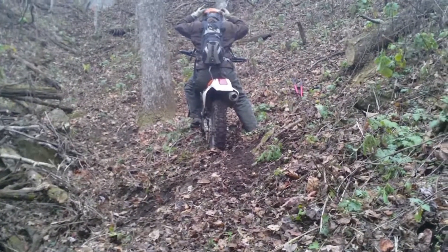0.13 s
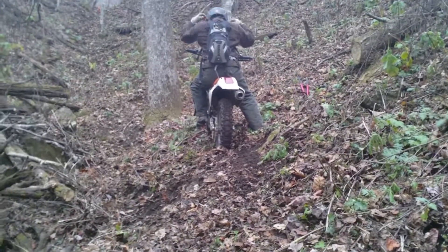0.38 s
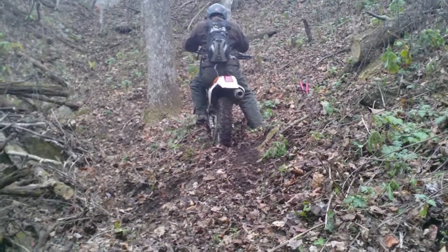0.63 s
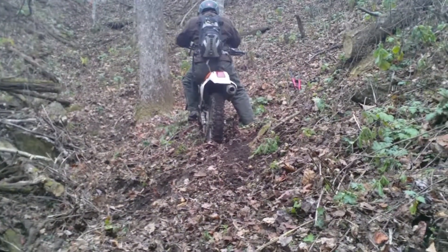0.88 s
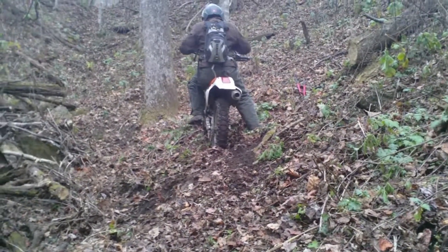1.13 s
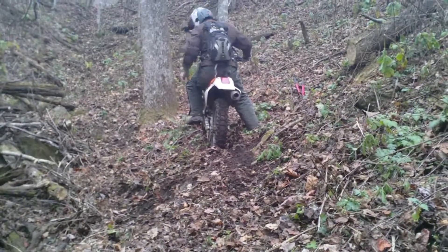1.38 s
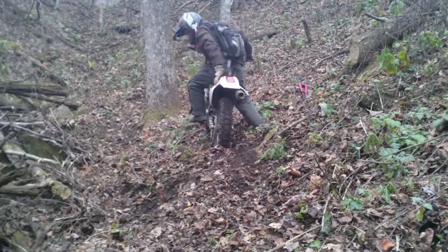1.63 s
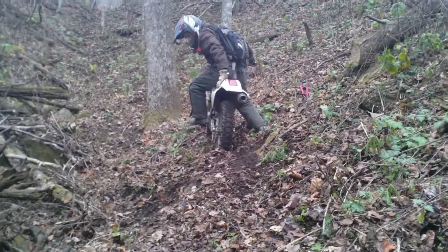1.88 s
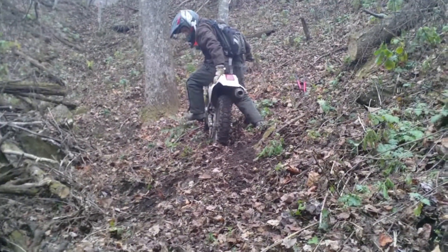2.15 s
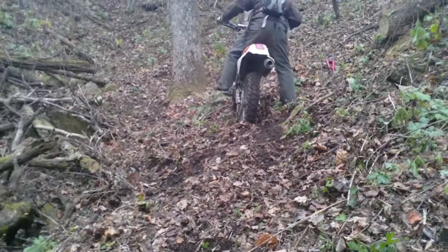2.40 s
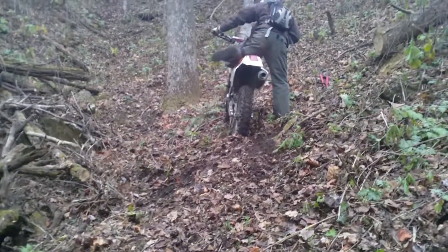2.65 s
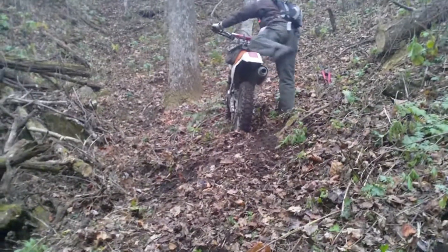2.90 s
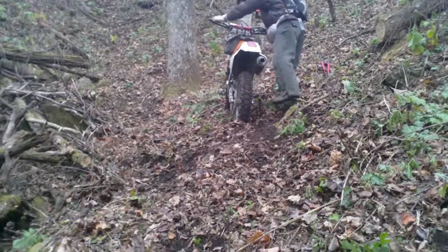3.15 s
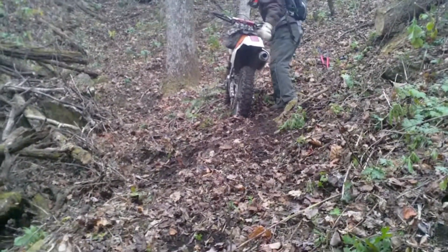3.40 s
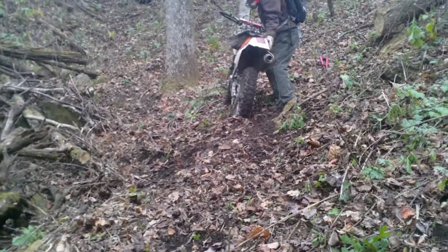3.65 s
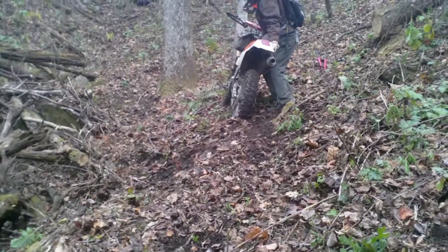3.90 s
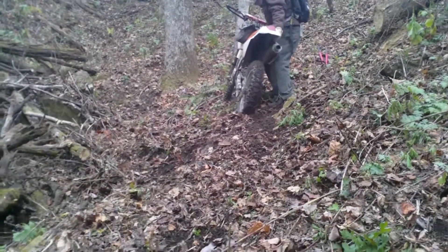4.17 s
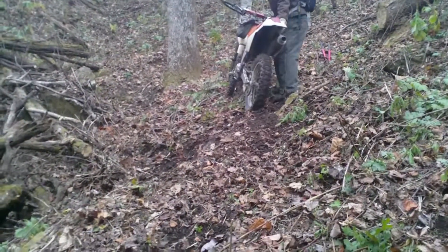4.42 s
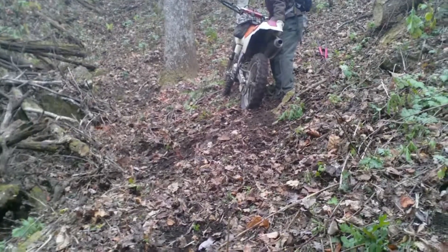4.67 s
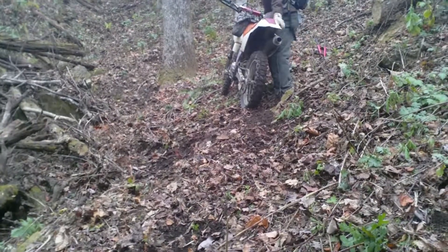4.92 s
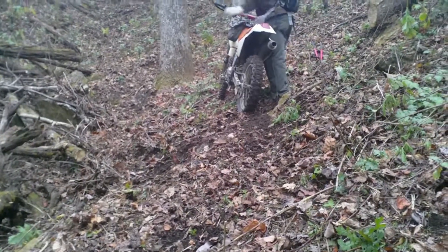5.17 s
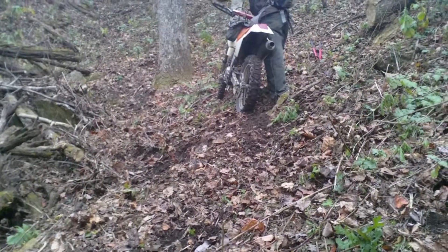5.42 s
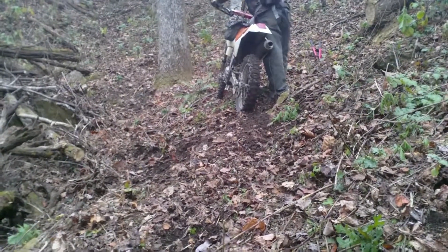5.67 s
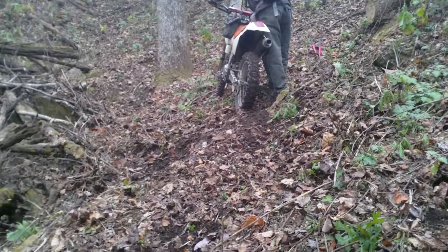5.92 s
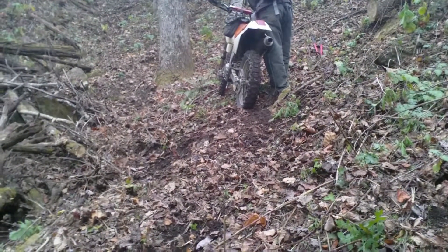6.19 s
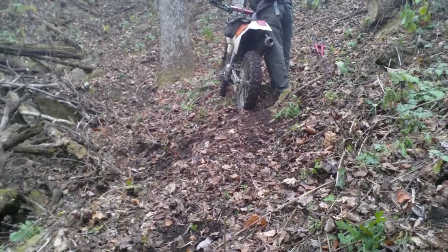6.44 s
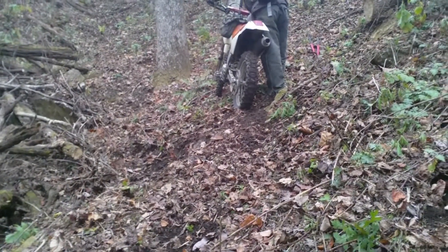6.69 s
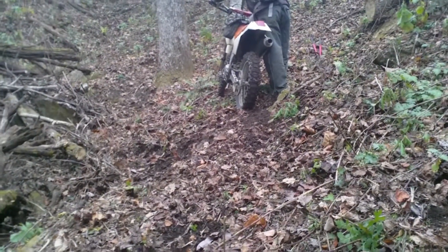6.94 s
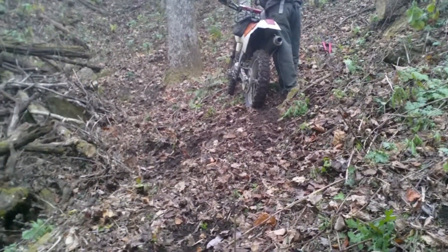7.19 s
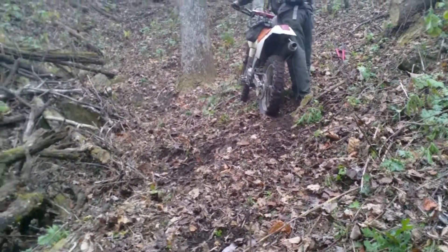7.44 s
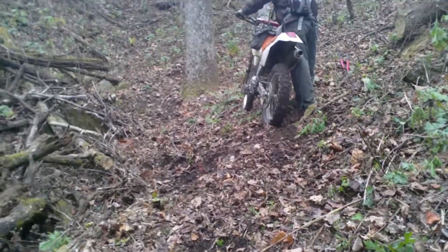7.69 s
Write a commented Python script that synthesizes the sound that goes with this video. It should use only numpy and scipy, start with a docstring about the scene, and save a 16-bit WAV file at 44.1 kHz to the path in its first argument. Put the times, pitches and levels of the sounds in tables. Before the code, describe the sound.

A single-cylinder dirt bike idles roughly a few metres away on a wooded slope, its tail pipe facing the microphone. Hollow low thumps come about fourteen a second, with barky edges, misfires and light gear clatter. A small dry twig click comes early. Around six seconds loud backfires crack and the engine sputters faster; another bang follows near seven, before the idle returns. Short woodland reflections, faint hiss.

```python
"""Dirt bike idling in the woods

A single-cylinder four-stroke idles unevenly on a wooded slope, tail pipe towards a microphone some metres behind.
Each exhaust stroke plays filtered pulses: thump, bark, boom, gas noise and a valve tick; weak strokes misfire,
a few backfire loudly. Slope and trees add echoes and a short scatter; the ground adds a delayed dull copy.
Gear clatter runs on as flickering noise, one twig snaps, and faint hiss and steady tones lie underneath."""
import sys
import numpy as np
from scipy import signal
from scipy.fft import rfft, irfft
from scipy.io import wavfile
from scipy.ndimage import uniform_filter1d

SR = 44100
rng = np.random.default_rng(int(sys.argv[2]) if len(sys.argv) > 2 else 0)


def attenuation_scalar(level_db):
    """Turn a level in dB into a linear amplitude multiplier (20 dB per decade)."""
    decades = np.asarray(level_db, float) / 20
    return 10 ** decades


def transcribe(u):
    """Save the signal u as a 16-bit wav file named by the first command-line argument.

    u: samples, shape (n,) or (channels, n), limited to [-1, 1]; the rate is SR.
    q: integer samples, one column per channel.
    """
    v = np.clip(np.atleast_2d(u).T, -1, 1)
    q = np.round(v * 32767).astype(np.int16)
    wavfile.write(sys.argv[1], SR, q)


N = 344862
SIZE = 4096  # samples in one stroke shape
FULL_THUMP_DB = -20.5  # thumps below this are duller and quieten the running gear

# Silencer modes. Each row: nominal frequency in Hz, relative level in dB, t60 in s.
PIPE = [(605, -0.5, 0.092), (729, -7.5, 0.044), (946, -2, 0.054), (1066.6, -1.5, 0.046), (1237, 3.5, 0.04),
        (1511, -1, 0.05)]
# Pipe round trips, bank and trunks. Each row: delay in ms, signed gain of the low swing, of the high swing.
ECHOES = [(3.4, .17, .26), (3.95, -.22, -.22), (5.31, -.27, -.07), (6.26, -.25, -.28), (7.48, -.08, -.34),
          (8.84, -.22, -.01), (9.93, -.07, .16), (12.65, -.09, -.1), (14.01, .19, 0), (15.31, .07, .26),
          (16.8, .25, .18), (21.84, -.08, -.06), (37.5, .07, .07)]
# Engine state. Each row: time in s, then levels in dB before trims: thump, bark, running gear.
ENGINE = [(0, -21, -23.5, -41), (.6, -20, -22, -46), (1.1, -20.5, -27, -46), (1.9, -20.5, -22, -44.5),
          (2.3, -20, -30, -44), (3.07, -20.5, -22.5, -41.5), (3.5, -20, -23, -44.5), (4.2, -21, -39, -43),
          (5.6, -21, -28, -45), (5.9, -20, -26.5, -40), (6.6, -20.5, -24.5, -42.5), (7.5, -21, -30, -43),
          (7.82, -17, -30, -43.5)]


def ring(x, hz, width_hz, order=1):
    """A resonance with gain 1 at its centre, applied order times."""
    for _ in range(order):
        x = signal.lfilter(*signal.iirpeak(hz, hz / width_hz, SR), x)
    return x


def unit(x):
    """Scale to rms 1."""
    return x / np.sqrt(np.mean(x ** 2))


def coloured(points):
    """Noise with the spectrum of (Hz, dB) points."""
    hz, db = np.transpose(points)
    f = np.fft.rfftfreq(N, 1 / SR) + 1
    return irfft(rfft(rng.standard_normal(N)) * attenuation_scalar(np.interp(np.log(f), np.log(hz), db)), N)


def walk(rate_hz):
    """Random levels held 1 / rate_hz s and slewed twice."""
    k = int(SR / rate_hz)
    held = np.repeat(rng.standard_normal(N // k + 1), k)
    return 1.05 * uniform_filter1d(uniform_filter1d(held, k), k)[:N]


def late(x, ms):
    """Delay by a fractional time."""
    n = np.arange(len(x))
    return np.interp(n - ms * SR / 1000, n, x, left=0)


def ground(x, gain=.95):
    """Direct path plus the bounce 0.9 ms later off the leaf litter, which swallows the treble."""
    soft = signal.sosfilt(signal.butter(2, 1900, fs=SR, output="sos"), x)
    return x + gain * late(soft, .9)


def play(s, gain, shape):
    """Start the shape at each time with its gain, split between the two nearest samples."""
    train = np.zeros(N + 1)
    at = np.clip(s * SR, 0, N - 1)
    np.add.at(train, at.astype(int), gain * (1 - at % 1))
    np.add.at(train, at.astype(int) + 1, gain * (at % 1))
    return signal.fftconvolve(train, shape)[:N]


def modes(table, stretch, rise_s):
    """Struck modes that build up over rise_s; hotter gas stretches all pitches."""
    t = np.arange(SIZE) / SR
    rings = np.zeros(SIZE)
    for k, (hz, db, t60_s) in enumerate(table):
        tone = np.sin(2 * np.pi * hz * stretch * t)
        rings += (-1) ** k * attenuation_scalar(db) * tone * 1000. ** (-t / t60_s)
    return rings * (1 - np.exp(-(t / rise_s) ** 2))


def through_pipe(x, share):
    """Part of a noise sings in the silencer modes; rms 1."""
    return unit(x + share * sum(ring(x, hz, 39) for hz, _, _ in PIPE))


def blast(hz, width_hz, order, echo_gains):
    """The pipe mouth draws in first, then swings (peak 1); fixed echoes follow."""
    direct = ground(ring(-np.eye(1, SIZE)[0], hz, width_hz, order=order))
    direct = direct / np.abs(direct).max()
    return direct + sum(g * late(direct, row[0]) for row, g in zip(ECHOES, echo_gains))


def strokes():
    """Every exhaust stroke: time and levels of thump, bark, scatter, crack and valve tick, all led by the burn."""
    # Strokes that stand out: misfires, weak burns, backfires, changes of pace.
    # Each row: time in s, burn in dB against a plain stroke.
    marked = [(0.0509, 0.7), (0.3669, -3), (0.6947, -11.5), (0.9011, -3.5), (1.3321, 1), (1.4676, 0.9),
              (1.7354, 0.8), (2.1307, -8.5), (2.2006, -3.5), (2.2717, 0.4), (2.3512, -0.2), (2.4859, -10),
              (2.8379, 0), (2.9061, -2.5), (3.1102, 0.0), (3.242, -9), (3.4443, 0.5), (3.5737, -4),
              (3.7788, -3), (3.9902, -1.5), (4.1353, -3.5), (4.2763, 0.6), (4.3452, -3.5), (4.415, -19),
              (4.5719, -1), (4.7229, 0.6), (4.8676, -5.5), (4.9437, -6.5), (5.0999, -2.5), (5.2544, -0.6),
              (5.3251, 1), (5.4003, -21), (5.472, -23), (5.6268, -2.0), (5.7048, -0.2), (5.8505, 2.5),
              (5.917, 9.5), (5.964, 6.5), (6.015, -4), (6.0634, -7.5), (6.114, -10.5), (6.166, -13.5),
              (6.2135, 6), (6.2734, -7.5), (6.335, -24), (6.3848, -13), (6.4444, -9.5), (6.6442, -1.6),
              (6.7811, -9.5), (6.8544, 3.5), (6.9213, 8), (6.9765, -9), (7.027, -10), (7.0805, -9.5),
              (7.13, -8.5), (7.1905, -9.5), (7.2558, -17), (7.3202, -1.3), (7.6745, -3), (7.745, -10.5)]
    # How a layer follows the burn. Each: plain level in dB, dB per dB of weak burn, of strong burn,
    # lowest and highest dB before racing and scatter, racing lift in dB, own scatter in dB.
    scatter_law = (-30, 0.78, 2.5, -70, -15, 4.5, 0.7)
    crack_law = (-42.5, 2, 2.5, -57.5, -15, 10.5, 3)
    tick_law = (-57.5, 1.7, 1, -67.5, -48, 8, 3)
    idle_stroke_s, racing_s = .07, .061  # spacing of plain strokes; closer than racing_s, the engine races
    burn_scatter_db, backfire_from_db = 0.92, 3.5
    bark_per_weak_db, bark_per_backfire_db = 1.23, 5.75  # dB per dB of burn
    bark_racing_db, bark_scatter_db = 13.5, 4

    # Plain strokes fill the time between marked ones.
    at, marked_db = np.transpose(marked)
    gaps = np.maximum(1, np.round(np.diff(at) / idle_stroke_s))
    number = np.cumsum([0, *gaps]).astype(int)
    s = np.interp(np.arange(number[-1] + 1), number, at)

    chance = np.clip(rng.standard_normal((len(s), 5)), -2, 2).T
    burn = burn_scatter_db * chance[0]
    burn[number] = marked_db
    weak, strong = np.minimum(burn, 0), np.maximum(burn, 0)
    backfire = np.maximum(burn - backfire_from_db, 0)
    ordinary = backfire == 0  # backfires get no scatter
    racing = (np.diff(s, prepend=-1) < racing_s) & (burn < 0)

    def follow(law, z):
        """Layer level in dB from the burn, racing and chance."""
        plain, per_weak, per_strong, lowest, highest, lift, spread = law
        level = np.clip(plain + per_weak * weak + per_strong * strong, lowest, highest)
        return level + lift * racing + spread * z * ordinary

    when, thump_db, bark_db, _ = np.transpose(ENGINE)
    thump = np.interp(s, when, thump_db) + burn
    bark = np.interp(s, when, bark_db) + bark_per_weak_db * weak + bark_per_backfire_db * backfire
    bark = bark + bark_racing_db * racing + bark_scatter_db * chance[1] * ordinary
    scatter, crack = follow(scatter_law, chance[2]), follow(crack_law, chance[3])
    return s, thump, bark, scatter, crack, follow(tick_law, chance[4])


def exhaust(s, thump_db, bark_db, scatter_db):
    """Thump and boom keep their shapes; bark and silencer ring shift a little from stroke to stroke."""
    # Low and high swing of the pipe mouth.
    # Each row: centre in Hz, width of one filter pass in Hz, lead in ms, trim in dB.
    mouth = [(287, 1018, 2.33, 3.7), (600, 668, 2.93, 1.3)]
    # Lowest pipe modes. Each row: nominal frequency in Hz, relative level in dB, t60 in s.
    low_modes = [(71, -23, 0.084), (141.9, -20.5, 0.2), (290, -16, 0.074)]
    dull_per_db = 0.8  # weaker thumps lose their high swing faster
    boom_lead_s, bark_lead_s = .0030, .0020

    chance = rng.standard_normal((len(s), 3)).T
    _, *echo = np.transpose(ECHOES)
    missing_db = np.minimum(thump_db - FULL_THUMP_DB, 0)
    thump = np.zeros(N)
    for k, (hz, width_hz, lead_ms, db) in enumerate(mouth):
        gain = attenuation_scalar(thump_db + db + k * dull_per_db * missing_db)
        thump += play(s - lead_ms / 1000, gain, blast(hz, width_hz, 4 + k, echo[k]))
    boom = play(s - boom_lead_s, attenuation_scalar(thump_db), modes(low_modes, 0.98, 0.028))

    share = np.clip(.5 + 0.18 * chance[0], 0, 1)
    start = s - bark_lead_s + .00006 * chance[1]
    low_shape = blast(963, 530, order=5, echo_gains=0.26 * echo[1])
    high_shape = blast(1075, 590, order=5, echo_gains=0.42 * echo[1])
    low_bark = play(start, share * attenuation_scalar(bark_db - 5.0), low_shape)
    high_bark = play(start, (1 - share) * attenuation_scalar(bark_db - 4.5), high_shape)

    heat = np.clip(.5 + .3 * chance[2], 0, 1)
    cool = play(start, (1 - heat) * attenuation_scalar(scatter_db), modes(PIPE, 0.92, 0.0034))
    hot = play(start, heat * attenuation_scalar(scatter_db), modes(PIPE, 1.01, 0.0041))

    blow = thump + boom + low_bark + high_bark + attenuation_scalar(-3.0) * (cool + hot)
    # packing in the silencer rounds the front
    return signal.sosfilt(signal.butter(3, 1600, fs=SR, output="sos"), blow)


def gas(s, scatter_db, crack_db):
    """Rushing gas and forest scatter hold a moment after each blast and fade; hard strokes spit a bright crack."""
    # Gas spectrum. Each row: frequency in Hz, relative level in dB.
    gas_colour = [(60, -40), (200, -23), (420, -12), (520, -6), (620, 0), (800, -4), (1080, 0), (1350, -10),
                  (1520, -8), (1680, -12), (2000, -23), (2900, -27), (3800, -24), (4400, -40), (8000, -52)]
    t = np.arange(SIZE) / SR
    fade = 1 / (1 + (t / 0.019) ** 4) + 0.055 * np.exp(-t / 0.042)
    hold = np.clip(t / 0.0059, 0, 1) * fade
    noise = through_pipe(ground(coloured(gas_colour), .4), 2.0)
    rush = play(s, attenuation_scalar(scatter_db - 7.0), hold) * noise

    decay = np.exp(-t / 0.0033) + 0.13 * np.exp(-t / 0.029)
    spit = play(s, attenuation_scalar(crack_db - 5.0), np.minimum(t / 0.0011, 1) * decay)
    bright = ring(rng.standard_normal(N), 2300, 1080, order=3)
    bright = bright + 0.38 * ring(rng.standard_normal(N), 3470, 700, order=2)
    bright = bright + 0.013 * rng.standard_normal(N)
    return rush + spit * unit(bright)


def shock(s, crack_db):
    """Hard cracks steepen into a shock: a very short broad burst reaching the top of the treble."""
    t = np.arange(SIZE) / SR
    hard = crack_db > -31
    shape = np.exp(-t / 0.00071) + 0.034 * np.exp(-t / 0.011)
    burst = play(s[hard] + 0.0013, attenuation_scalar(crack_db[hard] - 12), shape)
    return burst * unit(ring(rng.standard_normal(N), 2900, 6000))


def valves(s, tick_db):
    """A short metallic tick as the exhaust valve lifts, and a weaker one an echo later."""
    t = np.arange(SIZE) / SR
    burst = play(s - .0020, attenuation_scalar(tick_db - 7), t / .0011 * np.exp(1 - t / .0011))
    return (burst + .3 * late(burst, 7.3)) * unit(ring(rng.standard_normal(N), 6600, 2600, order=3))


def running_gear(s, thump_db):
    """Gears and cam clatter on, flickering, quieter when the engine coasts; some of it leaves by the pipe."""
    # Clatter spectrum. Each row: frequency in Hz, relative level in dB.
    clatter_colour = [(40, -26), (65, -17), (130, -16), (200, -20), (270, -13), (400, -14), (620, -8),
                      (800, -14), (1070, -10), (1350, -15), (1550, -14), (1700, -22), (2000, -29),
                      (3200, -31), (4500, -44), (8000, -62)]
    t = np.arange(N) / SR
    when, db = np.transpose(ENGINE)[[0, -1]]
    missing_db = np.minimum(thump_db - FULL_THUMP_DB, 0)
    coast_db = 0.07 * np.interp(t - .02, s, missing_db)
    flicker_db = 3.2 * walk(60) + 1.6 * walk(7.7)
    level = attenuation_scalar(np.interp(t, when, db) - 3.5 + coast_db + flicker_db)
    return level * through_pipe(ground(coloured(clatter_colour), 0.14), 0.7)


def twig():
    """A dry snap close by: one broad click with a little 700 Hz body."""
    # Each row: time in s, level in dB before the shape's own gain.
    snaps = [(2.3383, -35)]
    s, db = np.transpose(snaps)
    t = np.arange(SIZE) / SR
    click = np.exp(-t / 0.00004) * (1 + .2 * rng.standard_normal(SIZE))
    body = np.sin(2 * np.pi * 700 * t) * np.exp(-t / 0.00098)
    return play(np.round(s * SR) / SR, attenuation_scalar(db), 1.8 * click + 3.2 * body)


def preamp_noise():
    """Preamp hiss that rises again in the high treble, and thin steady tones."""
    # Hiss spectrum. Each row: frequency in Hz, relative level in dB.
    hiss_colour = [(2000, -12), (4000, -16), (6000, -24), (8500, -32), (11000, -28.5), (15600, -21.5),
                   (15850, -43), (17000, -72)]
    # Steady tones. Each row: frequency in Hz, level in dB rms.
    whine = [(10106.4, -98), (10166.4, -89), (10226.4, -89), (10286.4, -97), (12408, -95)]
    hiss_rms_db = -63.5
    t = np.arange(N) / SR
    tones = sum(np.sqrt(2) * attenuation_scalar(db) * np.sin(2 * np.pi * hz * t) for hz, db in whine)
    return attenuation_scalar(hiss_rms_db) * unit(coloured(hiss_colour)) + tones


def scene():
    """The bike, and a snap in the litter."""
    s, thump_db, bark_db, scatter_db, crack_db, tick_db = strokes()
    pipe = exhaust(s, thump_db, bark_db, scatter_db) + gas(s, scatter_db, crack_db) + shock(s, crack_db)
    return (pipe + valves(s, tick_db) + running_gear(s, thump_db) + twig())[None]


def low_pass(x):
    """Removes everything above the highest recorded frequency."""
    return signal.sosfilt(signal.butter(12, 16990, fs=SR, output="sos"), x)


def record(dry):
    """The microphone cuts the deep bass, adds its own noise and clips at full scale."""
    high_pass = signal.butter(4, 54, "high", fs=SR, output="sos")
    mix = signal.sosfilt(high_pass, dry) + preamp_noise()
    return low_pass(np.clip(mix, -1, 1))


dry = scene()
out = record(dry)
transcribe(out)
```